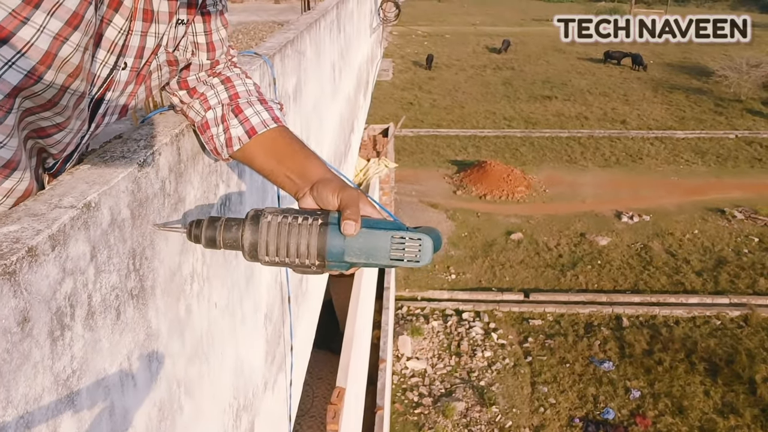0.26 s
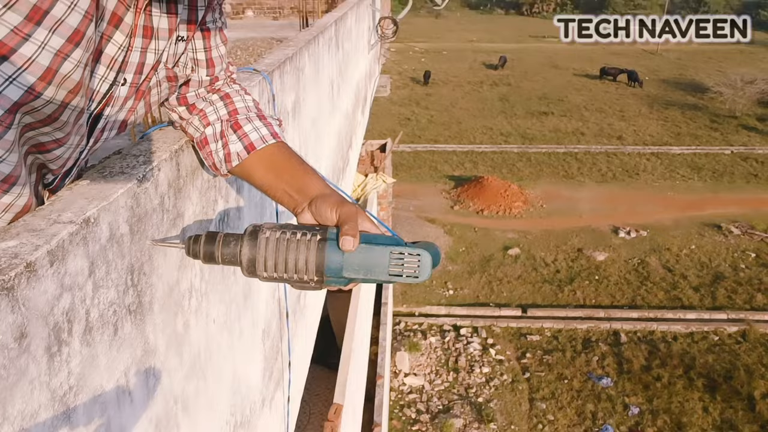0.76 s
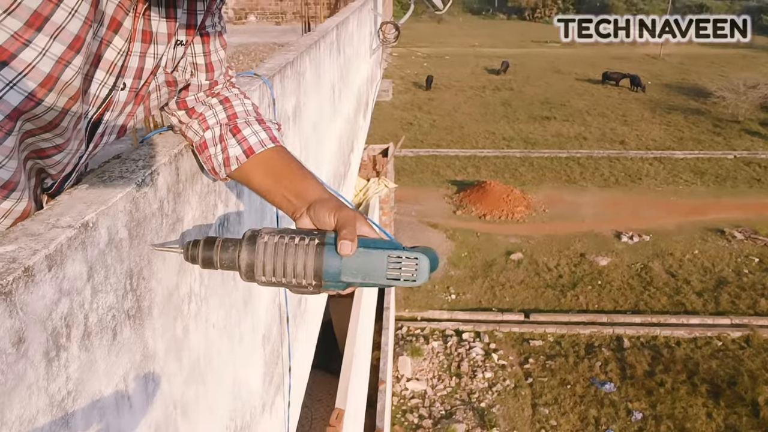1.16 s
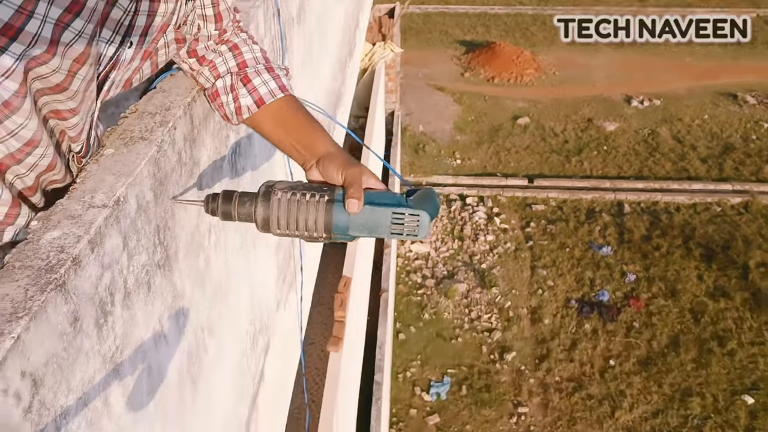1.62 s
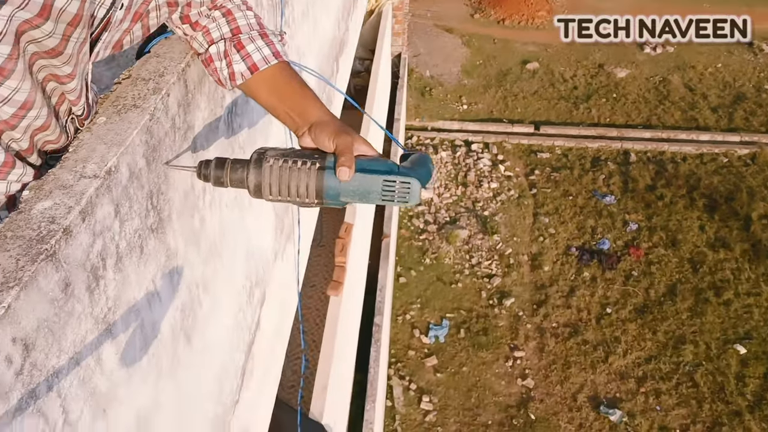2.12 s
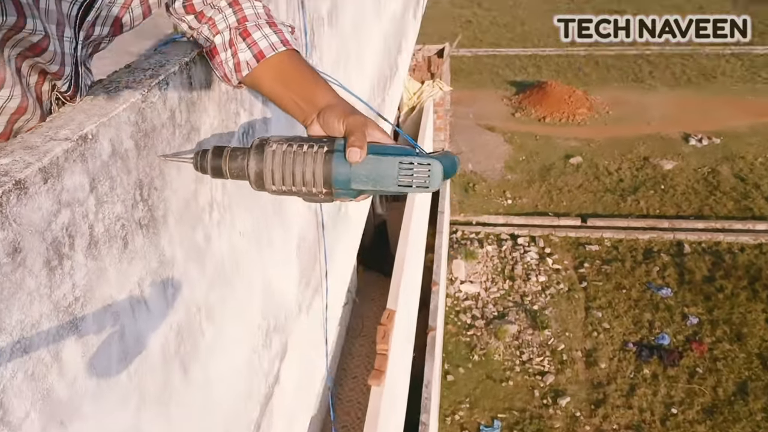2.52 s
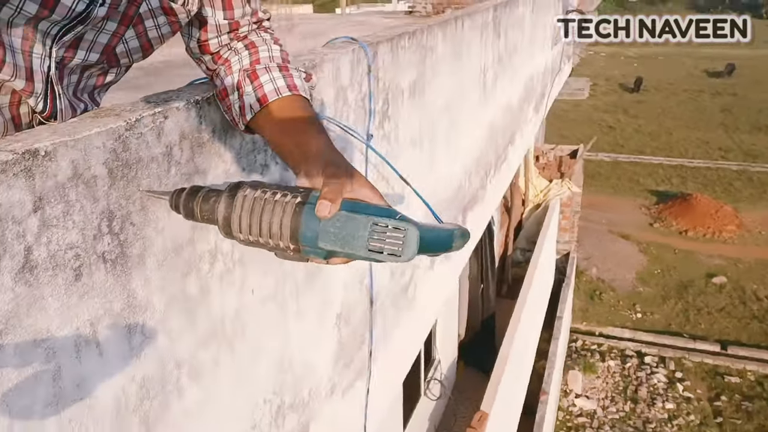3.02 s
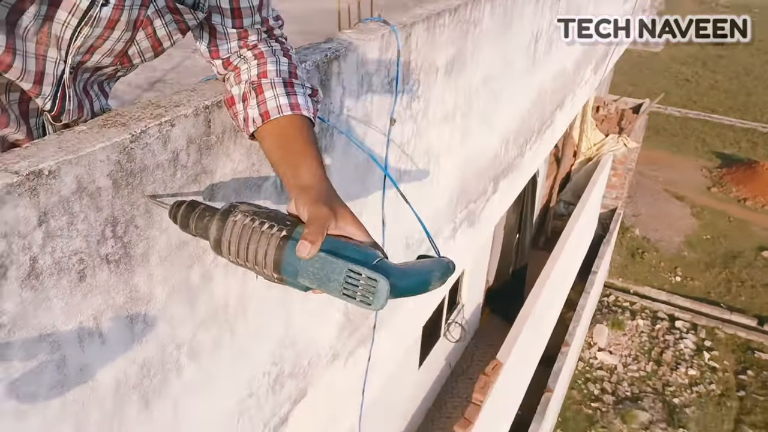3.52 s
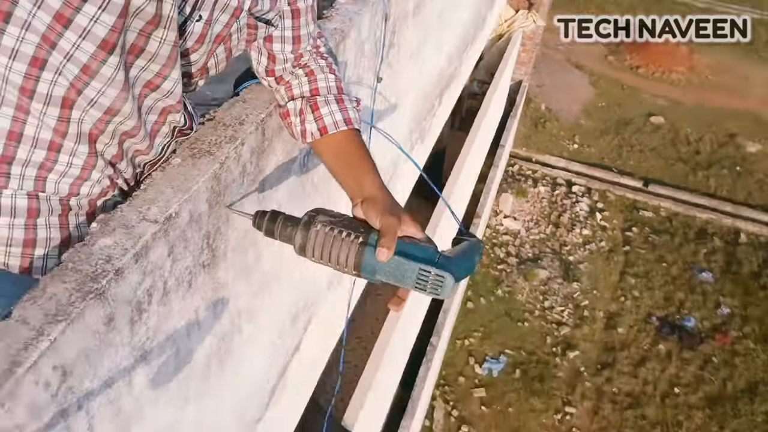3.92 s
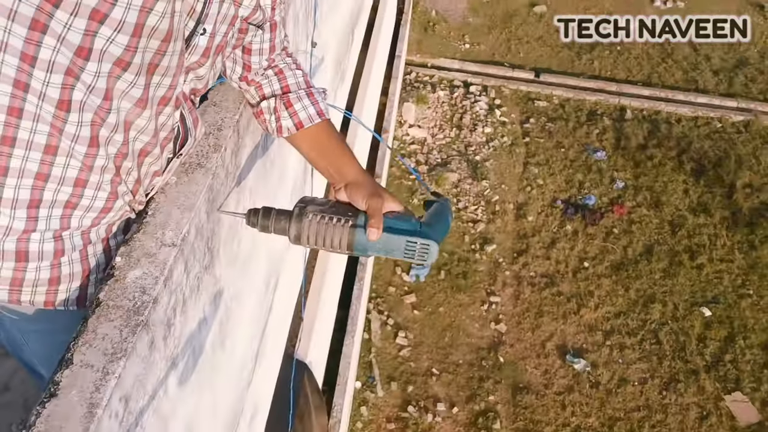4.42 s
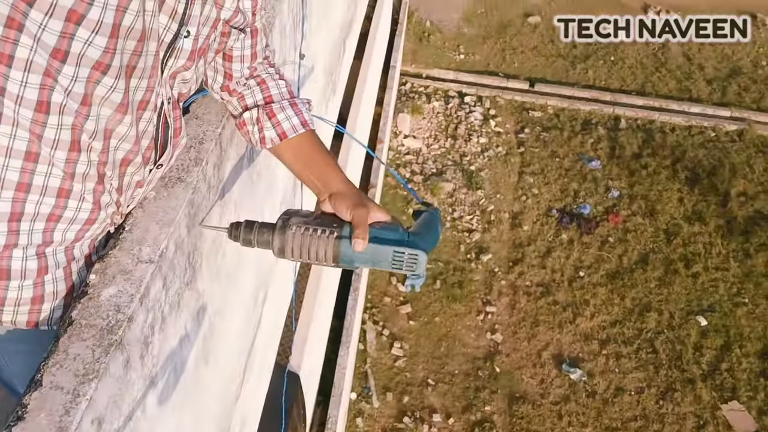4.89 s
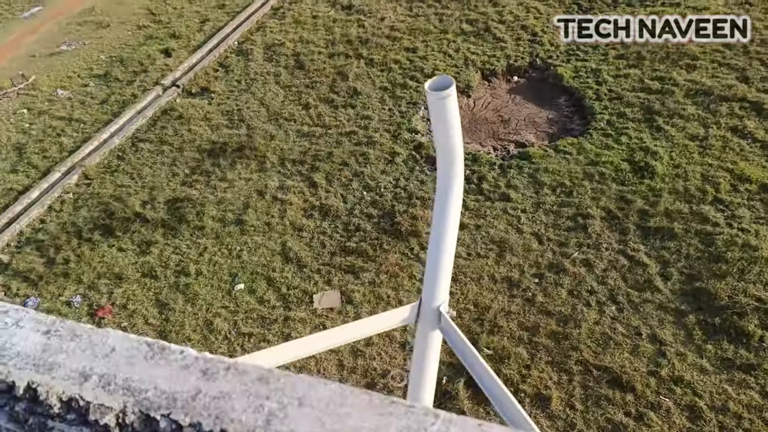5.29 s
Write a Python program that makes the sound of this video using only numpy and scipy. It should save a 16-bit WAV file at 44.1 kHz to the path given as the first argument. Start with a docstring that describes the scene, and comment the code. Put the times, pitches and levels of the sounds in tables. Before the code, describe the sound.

Outdoors on a rooftop, a nearby electric hammer drill pounds into concrete without a pause, with a buzzing rattle, ringing steel, a whining motor and gritty grinding. The hammering slows over the first two seconds and then holds, scraping more brightly past the middle while wind rumbles on the microphone. The sound stops abruptly, and after an instant of silence the wind comes back without the drill, along with one small tick.

```python
"""A rotary hammer drill bores into a concrete parapet on a windy roof, an arm's length from a phone.
The striker hits the bit 43 times a second, then 30 as the motor takes the load; each blow cracks the
concrete, rings the steel and rattles the housing over gear whine and fan rush. Gusts buffet the two
microphone ports. Near the end all sound drops out for a moment, and the roof comes back without the
drill: wind, faint open air and one small tick."""
import sys
import numpy as np
from scipy import signal
from scipy.fft import rfft, irfft
from scipy.io import wavfile

SR = 44100
rng = np.random.default_rng(int(sys.argv[2]) if len(sys.argv) > 2 else 0)


def unload_audio(sound):
    """Save the sound as a 16-bit wav file, at the path given as the first command line argument."""
    columns = np.transpose(np.atleast_2d(sound))
    # keep every value between -1 and 1, then stretch to whole-number steps
    steps = np.round(np.clip(columns, -1, 1) * 32767)
    wavfile.write(sys.argv[1], SR, steps.astype(np.int16))


N = 244755
T = np.arange(N) / SR
HZ = np.fft.rfftfreq(N, 1 / SR) + 0.0011  # never quite zero
LOADED_HZ, GEAR_TEETH = 30, 21

# Open air around the roof. Each row: frequency in Hz, relative level in dB.
AIR_SPECTRUM = [(240, -44), (400, -15), (604, -23), (707, 10), (939, -27), (1230, -16.5), (3530, -14.5),
                (5040, -28), (9690, -39), (12000, -49.5), (15600, -89.5), (22000, -120)]
# Wind on the microphone. Each row: frequency in Hz, relative level in dB.
BUFFET_SPECTRUM = [(18, -23.5), (35, -3), (70, -4.5), (115, -0.5), (190, -9), (280, -18), (500, -27),
                   (1500, -38), (6000, -56.5)]
# Breeze between the gusts. Each row: time in seconds, left and right level in dB.
BREEZE = [(0, -36, -33.5), (1.3, -41.5, -31.5), (1.6, -39, -38.5), (2.2, -35.5, -29.5), (3.8, -30, -41),
          (4.4, -31.5, -28.5), (5.15, -41.5, -32), (5.35, -36.5, -41)]
# Gusts, mostly from the right. Each row: start and length in seconds, left and right level in dB.
GUSTS = [(0.774, 0.087, -32, -38), (0.9, 0.25, -27.5, -32), (1.234, 0.065, -44, -19),
         (1.318, 0.08, -31, -24.5), (1.752, 0.073, -45, -28.5), (2.26, 0.23, -37, -20.5),
         (2.57, 0.4, -50, -19), (2.82, 0.3, -55, -20), (3.217, 0.19, -47, -18), (3.43, 0.22, -28, -18.5),
         (3.911, 0.403, -37, -20), (4.112, 0.096, -30, -20), (5.008, 0.085, -46, -24),
         (5.315, 0.022, -35, -43), (5.394, 0.042, -22.5, -34), (5.454, .12, -27, -18)]
# Puffs on the ports. Each row: time in seconds, left and right relative pressure step.
PUFFS = [(0.009, -0.43, 0.055), (0.0289, -0.031, -0.56), (0.175, 0.29, 0.2), (0.2001, -0.5, 0.25),
         (0.2247, 0.16, -0.28), (0.3487, 0.66, -0.093), (0.5485, -0.52, 0.55), (0.5742, 1.75, -1.17),
         (0.806, 0.011, -0.56), (1.1198, -0.78, 0.053), (2.9411, 0.084, 0.72), (2.944, 0.021, -0.33),
         (3.04, 0.0042, 0.074), (3.042, 0.076, 0.74), (3.106, -0.18, 0.51), (3.111, -0.27, -0.57),
         (3.638, 0.063, -0.4), (3.644, 0.1, 0.32), (3.7396, -0.0042, -0.69), (3.806, 0.00088, 0.89),
         (5.334, 0.07, -0.052)]
# The crank, sagging under load. Each row: time in seconds, speed in turns (blows) per second.
CRANK_SPEED = [(0, 42.878), (.25, 40.659), (.55, 39.21), (1.1, 37.769), (1.3, 34.186), (1.6, 31.752),
               (1.95, 30.387), (2.9, 29.852), (3.3, 29.966), (4.1, 30.441), (5.23, 30.775)]
# How the bit sits in the hole. Each row: time in seconds, then depth, binding and slack from 0 to 1.
SEATING = [(0, 0.34, 0, 0.83), (1.2, 0.32, 0.51, 0.67), (1.8, 0.57, 0, 0.57), (2.3, 0.43, 0.65, 0.93),
           (2.7, 0.18, 1, 0.67), (3.1, 0.27, 1, 1), (3.6, 0.45, 0.87, 0.3), (3.85, 0.73, 0.63, 0.7),
           (4.05, 0.7, 0.34, 0.48), (5.2, 0.75, 0.61, 0)]
# One turn: blow, rebound, two return knocks, slap, two pick-up knocks. Each row: position in turns,
# relative level of ring, scrape, crack and housing knock in dB, timing scatter in ms.
CONTACTS = [(0, -44, -1.5, -2, 14.5, 0.023), (0.06, -25, -23, -27, -26, 0.14),
            (0.185, -5.5, 0, -12, -3.5, 0.25), (0.264, -8.5, -0.5, -20, 7, 0.26),
            (0.562, -8.5, -10, -33, -7, 0.57), (.715, 3, -6, -28, -2.5, 0.04),
            (.775, -2, -2, -19, -7.5, 0.036)]
# Blows that sound louder or quieter than the rest; the two deepest dips fall under wind thumps.
# Each row: approximate time in seconds, level change in dB.
BLOW_LEVEL_CHANGES = [(.103, -1), (.198, -1.5), (.272, -0.5), (.371, 1), (.599, -0.5), (.806, -8),
                      (.831, 2), (.909, 1.5), (1.977, 0), (2.141, -0.5), (2.572, 0.5), (3.174, 2.5),
                      (3.374, 2), (3.574, 1.5), (3.64, -24), (3.838, 3), (3.904, 4), (4.003, 2.5),
                      (4.094, -1), (4.299, 0), (4.594, -3.5), (4.692, -2.5), (4.823, 1.5), (5.017, 3)]
# Gear whine. Each row: multiple of the crank speed (rounded in use), level in dB with the bit shallow
# and with it deep, change in dB at full binding.
GEAR_TONES = [(3, -36.5, -53, -2.5), (10, -46, -56, -3), (12, -44.5, -53, -1), (15, -50, -48.5, -13.5),
              (18, -63.5, -60.5, 14), (21, -38, -57, -14), (24, -47.5, -45, -8.5), (34, -64, -76, 14.5),
              (40, -56.5, -70.5, 13.5), (42, -53, -46, 3), (62, -52, -67, 8), (87.2, -50, -46.5, 5.5)]
# Air through fan and flutes. Each row: frequency in Hz, left and right relative level in dB.
RUSH_SPECTRUM = [(372, -8, -18), (900, -15.5, -11.5), (1250, -20.5, -5), (2000, -15.5, -4.5),
                 (2670, -9.5, 0.5), (3060, -10, -1.5), (3530, -7.5, -13.5), (4510, -10.5, -9.5),
                 (5600, -14.5, -6.5), (7210, -50, -12), (8020, -9.5, -36), (8400, -19.5, -22.5),
                 (12200, -26, -24.5), (15400, -46, -23)]
# Flutes grinding in the hole. Each row: frequency in Hz, left and right relative level in dB.
GRIND_SPECTRUM = [(2000, -14, -10), (3500, -10, -0.5), (4400, -12.5, -16), (5070, -14, 0.5),
                  (5430, -10.5, -2), (6300, -16, 3), (6800, -17.5, -1.5), (8100, -27, -21),
                  (9600, -14, -22), (15000, -36.5, -27)]
# Steel cracking concrete. Each row: frequency in Hz, left and right relative level in dB.
CRACK_SPECTRUM = [(724, -8, -8.5), (1315, -14, -9.5), (2410, -23.5, -3), (2980, -13, -10.5),
                  (3880, -24, -10), (4680, -4.5, -3), (6460, -13.5, -9.5), (7340, -29, -6),
                  (7670, -12, -16.5), (9730, -13.5, -30), (11500, -12, -22.5), (13040, -16, -10.5),
                  (14800, -18, -14), (15400, -31, -11.5)]
# Chips snapping off. Each row: time in seconds, relative level in dB.
CHIPS = [(0.0557, -11), (0.2233, -17), (0.249, -17), (0.396, -11), (0.7285, -9), (0.857, -15),
         (0.9351, -14), (0.9617, -15), (0.9892, -7.5), (1.1463, -10), (1.9452, -21), (2.175, -18),
         (2.4386, -12), (3.1737, -10), (3.5738, -5), (3.904, -8), (5.0493, -15), (5.1471, -18)]
# Ring of the housing. Each row: frequency and width in Hz, relative level in dB.
HOUSING_MODES = [(113.3, 15, 6), (196.6, 12, 7), (241.6, 37.4, 4), (351, 32, 2), (393, 80, 1.5),
                 (471.6, 48, 2), (518, 26, 1), (728, 72, 4.5), (1020, 340, -0.5), (1406, 220, 4.5)]
# Ring of the gear case. Each row: frequency and width in Hz, left and right relative level in dB.
GEARCASE_MODES = [(3225, 510, 2.5, -10.5), (4880, 400, 0.5, -9), (5720, 750, -31.5, 4.5),
                  (6580, 620, -18, 1), (8360, 190, -14.5, -26)]
# Rasp of the shank. Each row: frequency and width in Hz, left and right relative level in dB.
RASP_MODES = [(4620, 1200, 1, 0), (6800, 800, -10, 1.5), (11340, 1200, -25, -6.5)]
# High ring of the free bit. Each row: frequency and width in Hz, left and right relative level in dB.
ZING_MODES = [(8330, 330, 0.5, -25.5), (11800, 910, -8.5, -11), (13130, 750, 3, -3.5),
              (14700, 1000, -14, -7)]
# Ring of bit and chuck. Each row: frequency and width in Hz, relative level in dB shallow and deep.
STEEL_MODES = [(1550, 51, -4, -26), (1788, 68, 6, -26), (2008, 67, 3, 4.5), (2185, 65, 8, 6.5),
               (2365, 54, 10, 7), (2555, 57, 5, 13.5), (2890, 120, 5, -2), (3143, 130, 4.5, -11)]
# Striker on bit. Each row: frequency and width in Hz, relative level in dB shallow and deep.
STRIKER_MODES = [(1170, 170, -19, -10), (1980, 800, 6, -33), (2383, 520, 1.5, 21), (2766, 600, 8.5, -16.5)]


def undb(db):
    """Decibels to gain."""
    return 10 ** (np.asarray(db) / 20)


def rms(x):
    """Root mean square level."""
    return np.sqrt(np.mean(x ** 2))


def unit(x):
    """Scale to rms 1."""
    return x / rms(x)


def curves(table):
    """Each column of a table as a function of time."""
    seconds, *columns = np.transpose(table)
    return [np.interp(T, seconds, c) for c in columns]


def shape(x, response):
    """Filter by a frequency response."""
    return irfft(rfft(x) * response, N)


def colour(x, spectrum):
    """Filter by a spectrum table, rolling off below its first row; rms 1."""
    hz, *columns = np.transpose(spectrum)
    gain = undb([np.interp(np.log(HZ), np.log(hz), c) for c in columns])
    return unit(shape(x, gain / np.sqrt(1 + (hz[0] / HZ) ** 6)))


def mode(hz, width):
    """Response of one resonance."""
    return 1 / (1 + 1j * (HZ / hz - hz / HZ) * hz / width)


def resonate(x, table):
    """Pass through a body's resonances, each with its own level at the two ports; rms 1."""
    modes = np.array([mode(hz, width) ** 2 for hz, width, _, _ in table])
    return unit(shape(x, undb(np.transpose(table)[2:]) @ modes))


def ring_at_depth(push, modes, table, depth):
    """Ring the modes, fading from their shallow to their deep levels as the bit sinks."""
    shallow, deep = (unit(shape(push, undb(db) @ modes)) for db in np.transpose(table)[2:])
    return (1 - depth) * shallow + depth * deep


def disperse(x, ms, step_hz):
    """Bending waves: each frequency arrives after its own delay of up to ms."""
    knots = np.arange(0, SR / 2, step_hz)
    delay = np.interp(HZ, knots, np.resize(rng.random(1024), len(knots))) * ms / 1000
    return shape(x, np.exp(-2j * np.pi * np.cumsum(delay) * SR / N))


def noise(shared):
    """Noise at the two ports, with a fraction of its power in common."""
    return np.sqrt(shared) * rng.standard_normal(N) + np.sqrt(1 - shared) * rng.standard_normal((2, N))


def drift(rate_hz):
    """Smooth random drift with spread near 1."""
    return 1.1 * np.interp(T * rate_hz, np.arange(4096), rng.standard_normal(4096))


def clicks(times, sizes):
    """Impulses at the given times."""
    return np.bincount(np.clip(np.ravel(times) * SR, 0, N - 1).astype(int), np.ravel(sizes), N)


def bursts(times, sizes, decay_ms):
    """Envelope that jumps at each time and dies away."""
    power = signal.lfilter([1], [1, -np.exp(-2000 / (decay_ms * SR))], clicks(times, np.square(sizes)))
    return np.sqrt(power + 1e-18)


def spell(start_s, length_s, edge_s):
    """Envelope that rises over edge_s from start_s and falls as fast once length_s has passed."""
    return np.clip(np.minimum(T - start_s, start_s + length_s + edge_s - T) / edge_s, 0, 1)


def open_air(air_db=-53, drone_db=-59, tick_s=5.502, tick_db=-25):
    """Faint noise of the fields, a far-off drone and one small tick."""
    tick = bursts([tick_s], [undb(tick_db)], decay_ms=1.2) * unit(shape(noise(0.43), mode(2300, 2300)))
    drone = unit(shape(noise(0.99), mode(hz=740, width=70) ** 2))
    return colour(noise(0.58), AIR_SPECTRUM) * undb(air_db) + drone * undb(drone_db) + tick


def wind(flurry_db=1.5, flurry_hz=14):
    """Gusts ride on a light breeze; eddies buffet each microphone port on its own."""
    power = undb(curves(BREEZE)) ** 2
    for start, length, *ports_db in GUSTS:
        power += (undb(ports_db)[:, None] * spell(start, length, edge_s=0.026)) ** 2
    return colour(noise(0), BUFFET_SPECTRUM) * np.sqrt(power) * undb(flurry_db * drift(flurry_hz))


def thumps(fall_ms=9, low_cut_hz=32, soft_hz=900):
    """A sudden puff steps the pressure at a port; the microphone's low cut swings it back."""
    times, *ports = np.transpose(PUFFS)
    steps = signal.lfilter([1], [1, -np.exp(-1000 / (fall_ms * SR))], [clicks(times, p) for p in ports])
    swings = signal.sosfilt(signal.butter(3, low_cut_hz, "high", fs=SR, output="sos"), steps)
    return shape(swings, 1 / (1 + 1j * HZ / soft_hz))


def gear_whine(turns, depth, binding, waver_db=3, wobble_rad=0.95):
    """Gear teeth whine at multiples of the crank speed and waver under the load."""
    whine = np.zeros(N)
    for multiple, shallow_db, deep_db, bind_db in GEAR_TONES:
        db = shallow_db + (deep_db - shallow_db) * depth + bind_db * binding
        db += waver_db * (drift(9.8) + drift(2.7) / 2)
        phase = 2 * np.pi * round(multiple) * turns + wobble_rad * drift(60)
        whine += np.sqrt(2) * undb(db) * np.sin(phase)
    return whine


def gear_rattle(turns, stroke_db=3, hardest_turn=0.64, scatter_db=6.5, play_ms=0.035):
    """Each tooth clacks into the next and rings the gear case, hardest while the piston compresses."""
    turn = np.arange(int(turns[-1] * GEAR_TEETH)) / GEAR_TEETH
    timing, force = rng.standard_normal((len(turn), 2)).T
    times = np.interp(turn, turns, T) + timing * play_ms / 1000
    sizes = undb(stroke_db * np.cos(2 * np.pi * (turn - hardest_turn)) + scatter_db * force)
    return resonate(clicks(times, sizes), GEARCASE_MODES)


def fan_rush(turns, flutter_db=2.85, rub_gain=0.39, tooth_db=2.5):
    """Fan air flutters out of the vents, chopped at the rate of the gear teeth."""
    # worn teeth and bearings rub the same way on every turn
    wear = rng.standard_normal((2, 512))
    rub = np.array([np.interp(turns % 1, np.linspace(0, 1, 512), track) for track in wear])
    chop_db = -tooth_db * np.cos(2 * np.pi * GEAR_TEETH * turns)
    air = noise(0.25) + rub_gain * rub
    return colour(air * undb(flutter_db * drift(300) + chop_db), RUSH_SPECTRUM)


def housing_buzz(times, sizes, ring_ms=2.1, lag_ms=0.26, lead_ms=1.604):
    """The same knocks shake the case on every turn: a buzz that reaches the left port later."""
    body = sum((-1) ** k * undb(db) * mode(hz, width) for k, (hz, width, db) in enumerate(HOUSING_MODES))
    ports = np.exp(-2j * np.pi * HZ * np.array([[lag_ms / 1000], [0]]))
    knocks = disperse(clicks(times - lead_ms / 1000, sizes), ring_ms, step_hz=394)
    return unit(shape(knocks, ports * body / (1 + (HZ / 1700) ** 6)))


def thin_crack(envelope, low_cut_hz):
    """Small bits of concrete give only the treble of a crack; rms 1."""
    crack = colour(envelope * noise(0.05), CRACK_SPECTRUM)
    return unit(shape(crack, 1 / (1 + (low_cut_hz / HZ) ** 6)))


def crumbs(count=2200, spread_db=4):
    """Crumbs of concrete spray from the hole: a fine, irregular sizzle."""
    when, chance = rng.random((count, 2)).T
    sizes = undb(-spread_db * np.log(np.maximum(chance, .03)))
    return thin_crack(bursts(when * T[-1], sizes, decay_ms=1), low_cut_hz=8000)


def chips(trim_db=-2.5):
    """Now and then a chip snaps off with a thin tick."""
    times, db = np.transpose(CHIPS)
    envelope = bursts(times, undb(db + trim_db), decay_ms=1.7)
    return thin_crack(envelope, low_cut_hz=7500) * rms(envelope)


def shank_rasp(times, sizes, level_db=-34):
    """As the tool tilts, the shank rubs the rim of the hole with a bright rasp."""
    tilt = spell(start_s=2.92, length_s=0.91, edge_s=0.21)
    return resonate(bursts(times, sizes, decay_ms=4) * noise(0.52), RASP_MODES) * undb(level_db) * tilt


def flute_grind(times, sizes, grain=0.55, lead_ms=0.4):
    """Each contact drags the flutes through the dust: a short, bright scrape."""
    envelope = bursts(times - lead_ms / 1000, sizes, decay_ms=1.6)
    return colour(envelope * np.exp(grain * drift(640)) * noise(0.46), GRIND_SPECTRUM)


def concrete_crack(times, sizes, level_db, grain=0.23, lead_ms=0.3):
    """The tip crushes the concrete in a short gritty burst."""
    envelope = unit(bursts(times - lead_ms / 1000, sizes, decay_ms=1.5)) * undb(level_db)
    grit = np.exp(grain * drift(640)) * noise(0.082)
    return colour(envelope * grit, CRACK_SPECTRUM) * rms(envelope)


def bit_zing(times, sizes, scatter_db=3, lead_ms=0.65, grip_s=0.82, grip_over_s=2.7, grip_db=-9):
    """The bit's high modes zing unevenly with each crack, and fade as the hole grips it."""
    uneven = sizes * undb(scatter_db * rng.standard_normal(sizes.shape))
    envelope = bursts(times - lead_ms / 1000, uneven, decay_ms=2.2)
    grip = np.clip((T - grip_s) / grip_over_s, 0, 1)
    return resonate(envelope * noise(0.5), ZING_MODES) * undb(grip_db * grip)


def steel_ring(times, sizes, depth, looseness=0.63, contact_ms=3.405, lead_ms=1.44):
    """Each contact rings bit and chuck, much the same every turn; the ring narrows as the bit sinks."""
    times = times - lead_ms / 1000
    regular = unit(disperse(clicks(times, sizes), contact_ms, step_hz=157.6))
    loose = unit(bursts(times, sizes, contact_ms) * noise(0.086))
    band = 1 / (1 + (1350 / HZ) ** 8) / (1 + (HZ / 3500) ** 12)
    push = shape(regular + looseness * loose, band)
    modes = np.array([(-1) ** k * mode(hz, width) for k, (hz, width, _, _) in enumerate(STEEL_MODES)])
    return ring_at_depth(push, modes, STEEL_MODES, depth)


def striker_blow(times, sizes, depth, lead_ms=0.884, sweep_ms_per_khz=0.44,
                 bounce_gain=0.25, bounce_ms=1.294, sooner_ms=0.53):
    """The striker knocks, low notes first, and bounces once: narrower and sooner as the bit sinks."""
    centre_hz = STRIKER_MODES[2][0]
    sweep = np.exp(-1j * np.pi * sweep_ms_per_khz * ((HZ - centre_hz) / 1000) ** 2)
    modes = np.array([mode(hz, width) ** 2 for hz, width, _, _ in STRIKER_MODES])
    modes *= sweep / (1 + (HZ / 3700) ** 12)
    times = times - lead_ms / 1000
    bounces = times + (bounce_ms - sooner_ms * np.interp(times, T, depth)) / 1000
    push = clicks(times, sizes) + bounce_gain * clicks(bounces, sizes)
    return ring_at_depth(push, modes, STRIKER_MODES, depth)


def contacts(turns, speed, binding, slack, blow_scatter_db=0.9, light_scatter_db=1.5,
             crush_scatter_db=2.2, bind_db=4, float_db_per_octave=-14):
    """Time, timing play and four levels of each contact in the hammer, one row for each turn."""
    turn, *db, spread_ms = np.transpose(CONTACTS)
    whole_turns = np.arange(int(turns[-1]))[:, None]
    chance = rng.standard_normal((len(whole_turns), 6, len(turn))).swapaxes(0, 1)
    times = np.interp(whole_turns + turn, turns, T)
    scatter_db = np.where(turn > 0, light_scatter_db, blow_scatter_db)
    sizes = undb(np.array(db)[:, None] + chance[1:5] * scatter_db)
    for time, change_db in BLOW_LEVEL_CHANGES:
        nearest = np.argmin(abs(times[:, 0] - time))
        sizes[:3, nearest, 0] *= undb(change_db)
    ring, scrape, crack, knock = sizes
    crack *= undb(crush_scatter_db * chance[5])  # concrete gives way unevenly
    # a binding bit rebounds and scrapes harder
    bind = undb(bind_db * np.interp(times, T, binding))
    ring[:, 1:-2] *= bind[:, 1:-2]
    scrape[:, :-2] *= bind[:, :-2]
    ring[:, -2:] *= np.interp(times[:, -2:], T, slack)  # pick-up knocks ring only with slack
    # at high speed the striker floats and the first return knock fades
    fade = undb(float_db_per_octave * np.log2(np.interp(times[:, 2], T, speed) / LOADED_HZ))
    scrape[:, 2] *= fade
    crack[:, 2] *= fade
    return times, chance[0] * spread_ms / 1000, (ring, scrape, crack, knock)


def drill(first_blow_turn=.381, jam_ring_db=-5.5, jam_grind_db=6, jam_rush_db=1,
          ring_pan_db=-17.5, housing_pan_db=-2, whine_pan_db=-3.6):
    """Close by on the right, one crank drives the tool; binding chokes the blow and shakes the case."""
    speed, = curves(CRANK_SPEED)
    # the uneven load makes the crank run slightly ahead and behind
    turns = np.cumsum(speed) / SR - first_blow_turn + 0.0035 * drift(12)
    depth, binding, slack = np.clip(curves(SEATING), 0, 1)
    jam = spell(start_s=3.025, length_s=0.73, edge_s=0.37)
    pan = np.array([[0.5], [-0.5]])  # pans are left minus right
    swing_db = pan * 6 * spell(start_s=2.81, length_s=0.34, edge_s=0.13)  # once toward the middle
    hand_db = drift(7.1)  # unsteady hold
    motion_db = hand_db + swing_db
    crank_times, play, (ring, scrape, crack, knock) = contacts(turns, speed, binding, slack)
    times = crank_times + play

    def level(loaded_db, octave_db, bind_db=0):
        """Level in dB at loaded speed, plus so much per octave of speed and at full binding."""
        return loaded_db + octave_db * np.log2(speed / LOADED_HZ) + bind_db * binding

    # as the bit sinks, the blow gets quieter and the ring grows
    blow = striker_blow(times[:, 0], ring[:, 0], depth) * undb(1.4 - 4 * binding - 4.2 * depth)
    steel = steel_ring(times, ring, depth) * undb(-7 + 8.5 * depth)
    out = (blow + steel) * undb(level(-31, 0.62, 1.9) + jam_ring_db * jam + pan * ring_pan_db + swing_db)
    out += concrete_crack(times, crack, level(-32, 5.6, 1) + hand_db) + chips()
    out += bit_zing(times, crack) * undb(level(-38.5, 6))
    out += gear_rattle(turns) * undb(level(-35, 12))
    out += flute_grind(times, scrape) * undb(level(-34.5, 2.1, 1.45) + jam_grind_db * jam + motion_db)
    out += fan_rush(turns) * undb(level(-28.5, 9.5, 4.05) + jam_rush_db * jam + motion_db)
    out += crumbs() * undb(level(-45, 12)) + shank_rasp(times, scrape)
    out += housing_buzz(crank_times, knock) * undb(level(-36, 8.7, 4.3) + pan * housing_pan_db)
    return out + gear_whine(turns, depth, binding) * undb(pan * whine_pan_db)


def scene(cut_s=5.231, resume_s=5.322):
    """Drilling on the windy roof, a short silence, then the roof alone."""
    before = np.clip((cut_s - T) / 0.016, 0, 1)
    after = np.clip((T - resume_s) / 0.01, 0, 1)
    return drill() * before + (wind() + thumps() + open_air()) * (before + after)


def record(dry, top_hz=15700):
    """The phone clips at full scale and cuts the top."""
    low_pass = signal.ellip(8, .2, 70, top_hz, fs=SR, output="sos")
    return signal.sosfilt(low_pass, np.clip(dry, -1, 1))


dry = scene()
out = record(dry)
unload_audio(out)
```